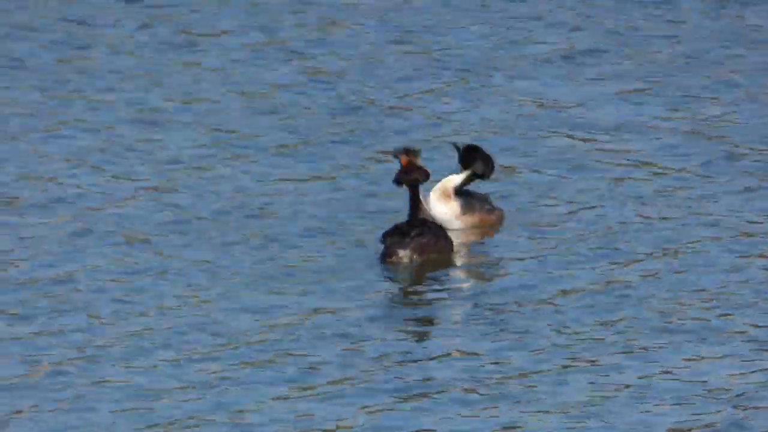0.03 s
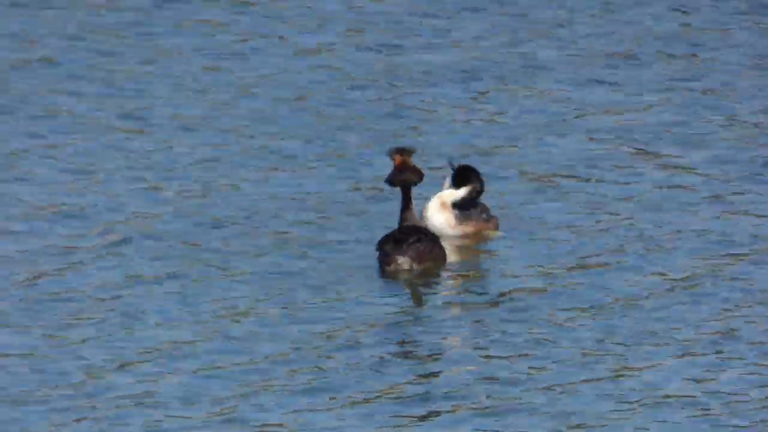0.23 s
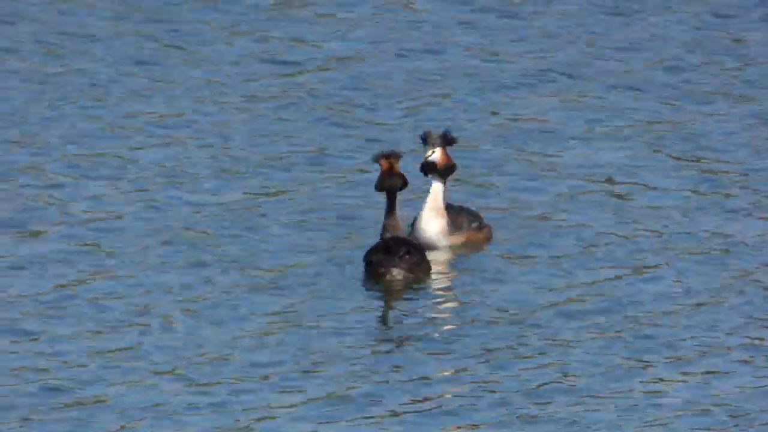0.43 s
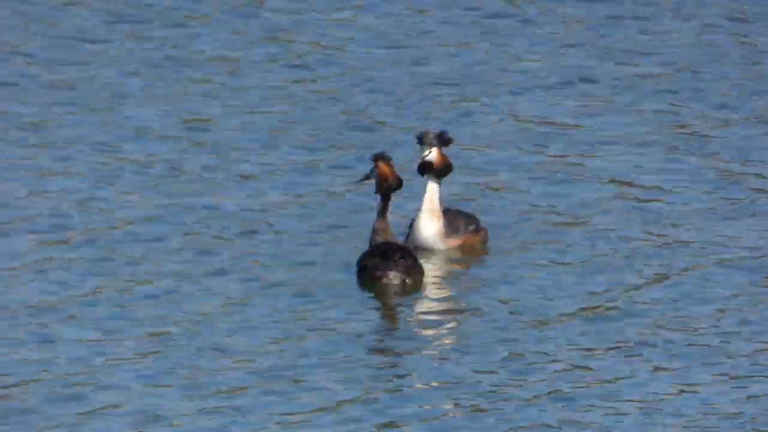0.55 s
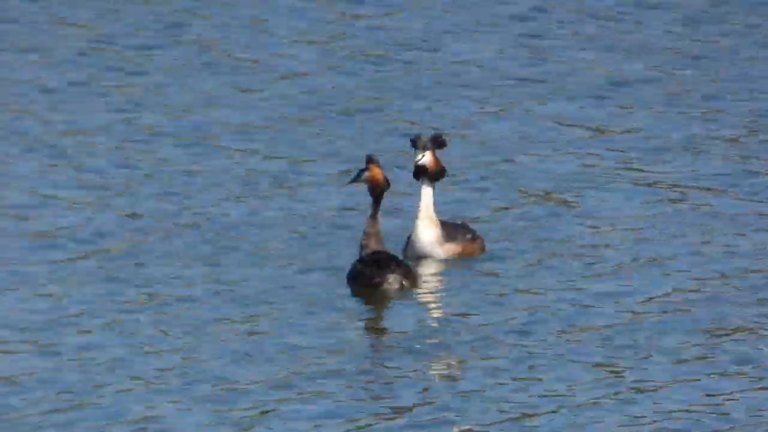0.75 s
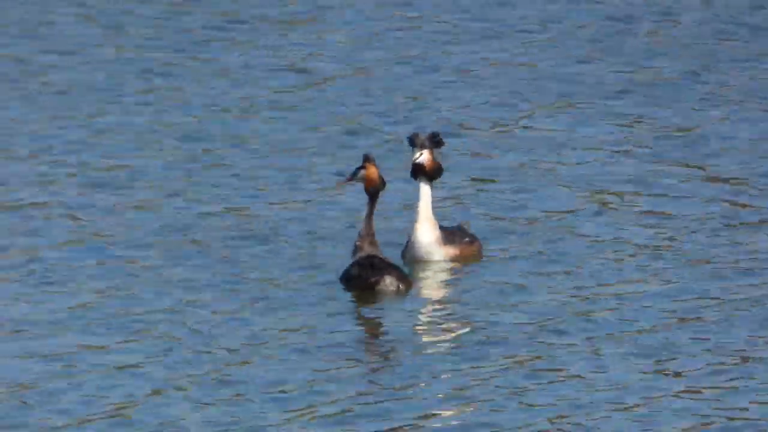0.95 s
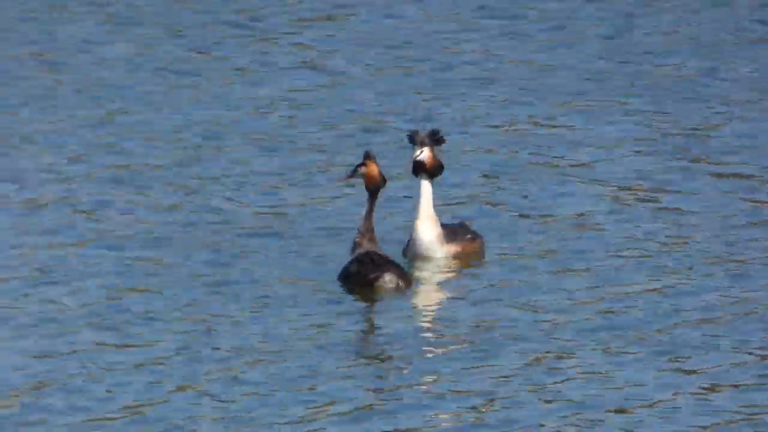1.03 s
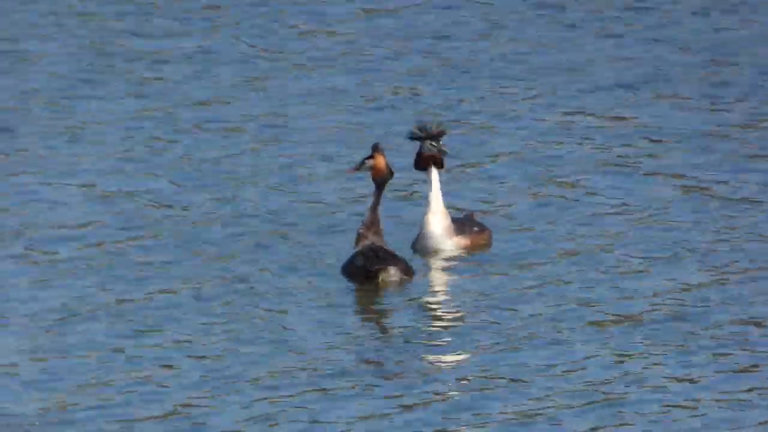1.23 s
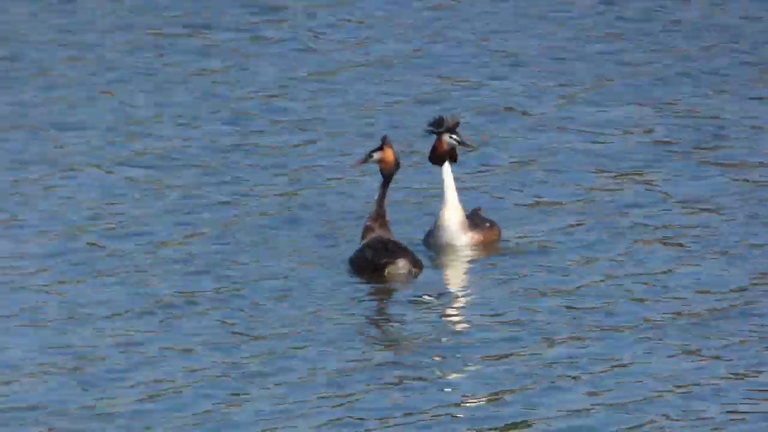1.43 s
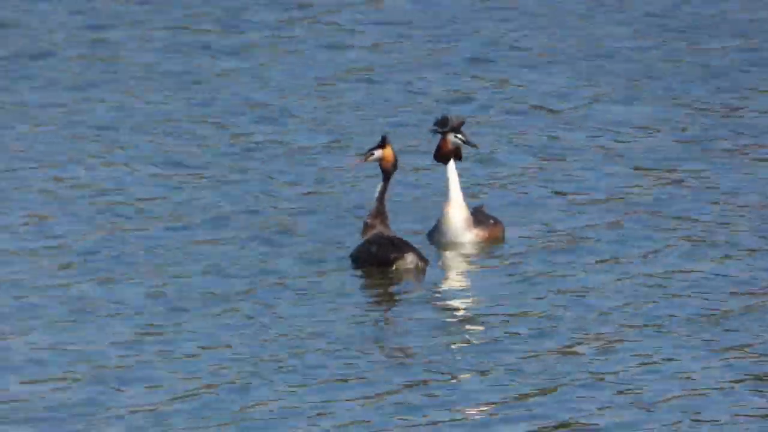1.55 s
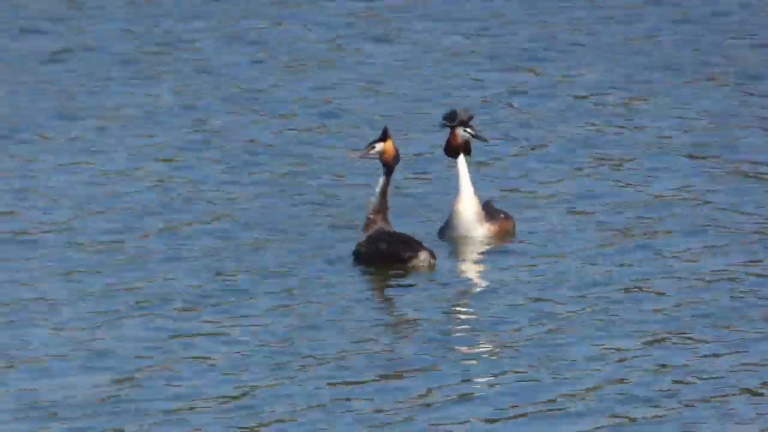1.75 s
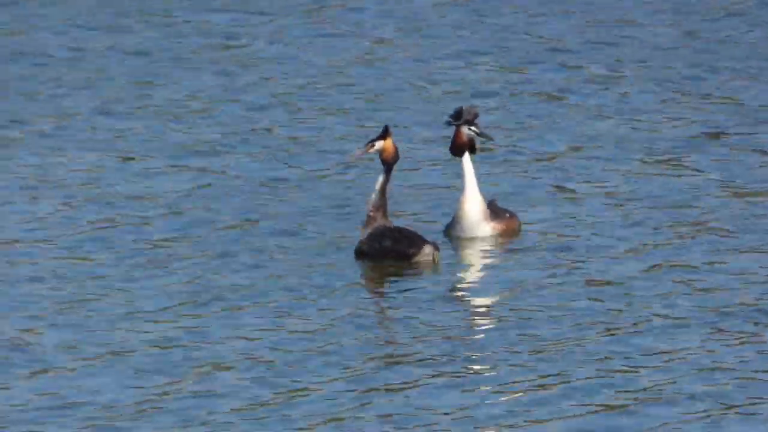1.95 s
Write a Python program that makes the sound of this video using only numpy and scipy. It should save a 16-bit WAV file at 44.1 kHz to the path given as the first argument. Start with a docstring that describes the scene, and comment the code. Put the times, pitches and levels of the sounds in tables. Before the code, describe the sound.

A faint small bird pipes thinly for the first 0.2 seconds over low, soft lake rumble. From about 0.2 to 0.86 a grebe calls harshly nearby, a rising whistle shredded by rapid rasping flutter, with throaty clucks and airy hiss, dropping as it closes. From 1.0 to 1.6 a weaker, reverberant call comes from far away. Small water plops appear from 0.87, with light splashes after 1.5.

```python
"""Grebe call on open water

Heard from the shore, in stereo: one harsh near call, a rising whistle that drops as it closes,
broken by about seventy rasping bursts a second (sine overtones, with clicks and air ringing a throat).
A fainter, blurred call of the same kind comes from far across the lake, mostly as reflections.
Wavelets plop (rising sines in froth) and splash (sprays of noise), and a small bird pipes faintly
as a wavering sine over a low distant rumble of coloured noise."""
import sys
import numpy as np
from scipy import signal
from scipy.fft import rfft, irfft
from scipy.io import wavfile
from scipy.ndimage import uniform_filter1d

SR = 44100
rng = np.random.default_rng(int(sys.argv[2]) if len(sys.argv) > 2 else 0)


def master_out(mix):
    """Clip the mix to full scale and print it as 16-bit PCM to the path in sys.argv[1]."""
    frames = np.transpose(np.atleast_2d(mix))
    ceiling = np.clip(frames, -1, 1)
    pcm = np.round(ceiling * 32767).astype(np.int16)
    wavfile.write(sys.argv[1], SR, pcm)


N = 88200  # samples, two seconds


def undb(db):
    """Decibels to amplitude gain."""
    return 10 ** (np.asarray(db) / 20)


def unit(x):
    """Scale to rms 1."""
    return x / np.sqrt(np.mean(x ** 2))


def colour(x, points):
    """Minimum-phase filter through (f/Hz, level/dB) points joined on a log-frequency axis."""
    hz, db = np.array(points, float).T
    f = np.maximum(np.arange(N // 2 + 1) * SR / N, 1)
    log_gain = np.log(undb(np.interp(np.log(f), np.log(hz), db)))
    # folding the cepstrum forward makes the filter causal
    cepstrum = irfft(log_gain, N)
    cepstrum[1:N // 2] *= 2
    cepstrum[N // 2 + 1:] = 0
    return irfft(rfft(x) * np.exp(rfft(cepstrum)), N)


def walk(rate):
    """Smooth random wander with spread 1; a higher rate in Hz wanders faster."""
    k = max(int(SR / rate), 1)
    noise = rng.standard_normal(N)
    return unit(uniform_filter1d(uniform_filter1d(noise, k), k))


def reflect(x, t60, damp_hz):
    """Diffuse reflections: a decaying noise tail, different in each ear, with a dulled treble."""
    t = np.arange(N) / SR
    pole = np.exp(-2 * np.pi * damp_hz / SR)
    tail = signal.lfilter([1 - pole], [1, -pole], rng.standard_normal((2, N)))
    tail *= undb(-60 * t / t60)
    tail /= np.sqrt(np.sum(tail ** 2, axis=1, keepdims=True))
    return signal.fftconvolve(x[None], tail, axes=1)[:, :N]


# near call: t/s, pitch f/Hz, whistle level/dB, octave overtone level/dB, rasp level/dB
NEAR_CALL = [(.215, 1617, -50, -67, -56), (.235, 1740, -48, -46, -42), (.26, 1850, -46, -44.5, -39.5),
             (.295, 2040, -39.5, -42.5, -35), (.312, 2146, -38.5, -38.5, -37),
             (.328, 2400, -33.5, -44, -34.5), (.36, 2506, -25, -37, -34), (.385, 2620, -28, -39, -35),
             (.42, 2600, -32, -41, -33), (.47, 2808, -29.5, -36.5, -34), (.53, 2947, -26.5, -42, -29.5),
             (.62, 3038, -36.5, -28, -31.5), (.71, 3071, -28.5, -30.5, -36), (.76, 3187, -38, -29, -40.5),
             (.80, 3055, -37.5, -38, -40), (.818, 2734, -34, -47, -43.5), (.832, 2623, -46, -55, -44.5),
             (.86, 2630, -61, -72, -53)]
# call from far across the lake: t/s, pitch f/Hz, whistle level/dB, octave level/dB, rasp level/dB
FAR_CALL = [(1.02, 1495, -56, -65, -61.5), (1.045, 1823, -60.5, -97, -60), (1.06, 2315, -47.5, -82, -61),
            (1.12, 2300, -54, -65, -56.5), (1.22, 2740, -57, -65, -57.5), (1.32, 3030, -53, -55, -53.5),
            (1.43, 3155, -54, -51.5, -56.5), (1.51, 3126, -75, -70, -57.5), (1.58, 2820, -72, -69, -63)]
NEAR_JITTER, FAR_JITTER = .008, .03  # pitch wander, as a share of the pitch
RIPPLE_T60_S, RIPPLE_DB = .07, -14
SHORE_T60_S, SHORE_DAMP_HZ, SHORE_DB, SHORE_DELAY_S = 0.35, 2500, -17, .07
FAR_WET_DB, FAR_DIRECT_DB, FAR_T60_S = -2.5, -3, 0.67


def calls(t):
    """The near call, scattered by ripples and returned by the shore, and the far call, mostly reflections."""
    near = grebe(NEAR_CALL, t, NEAR_JITTER) + clucks(t)
    far = grebe(FAR_CALL, t, FAR_JITTER)
    direct = placed(near + undb(FAR_DIRECT_DB) * far, t) + bill_hiss(t)
    ripples = undb(RIPPLE_DB) * reflect(near, RIPPLE_T60_S, damp_hz=12100)
    delayed = np.pad(near, (int(SHORE_DELAY_S * SR), 0))[:N]
    shore = undb(SHORE_DB) * reflect(delayed, SHORE_T60_S, SHORE_DAMP_HZ)
    far_reflections = undb(FAR_WET_DB) * reflect(far, FAR_T60_S, damp_hz=7940)
    return direct + ripples + shore + far_reflections


# overtones 3 and 4 against the octave, before the bill: level/dB
UPPER_OVERTONES = [-8, -7]
# what the bill passes of the overtones: f/Hz, level/dB
BILL = [(3000, -3), (4000, 5), (5000, -10.5), (6200, -7.5), (8000, 2), (9200, -16.5), (11000, -14),
        (15000, -35)]
# throat and bill colour of the rasp: f/Hz, relative level/dB per Hz
THROAT = [(400, -33), (800, -28), (1150, -8.5), (1600, -21.5), (2050, -6.5), (2450, 4), (3100, 1.5),
          (3500, -7), (4500, -8.5), (5300, -5), (6400, -4), (7300, -7.5), (8200, -20), (10000, -23.5),
          (12500, -28.5), (16000, -26)]
FIRST_BURST_S, FLUTTER_HZ, FLUTTER_SAG_HZ_PER_S = .2450, 73, 12
BURST_WIDTH = .16  # in flutter cycles
BURST_PITCH_DIP, BURST_JITTER = .07, .1  # shares of the pitch
BURST_DUCK = .35  # share of the tone's amplitude lost in a burst
RASP_BETWEEN_DB, BURST_SCATTER_DB, BREATH_DB = -15, .8, -1
CLICK_HZ, CLICK_SCATTER = 900, .2  # scatter in log rate
OVERTONE_BLUR_RAD, SHIMMER_DB = .4, .8


def grebe(table, t, jitter):
    """A whistle that dips and breaks up at each flutter, while a burst of uneven clicks and air rings the throat."""
    whistle, octave, rasp = (effort(table, t, column) for column in (2, 3, 4))
    age = t - FIRST_BURST_S
    cycle = FLUTTER_HZ * age - FLUTTER_SAG_HZ_PER_S * age ** 2 / 2 + 0.024 * walk(95)
    from_burst = (cycle + .5) % 1 - .5
    burst = np.exp(-.5 * (from_burst / BURST_WIDTH) ** 2)

    pitch = np.interp(t, *np.array(table).T[:2])
    break_up = burst ** 2 * (BURST_JITTER * walk(2000) - BURST_PITCH_DIP)
    hz = pitch * (1 + jitter * walk(285) + break_up)
    phase = 2 * np.pi * np.cumsum(hz) / SR
    blurred = phase + OVERTONE_BLUR_RAD * walk(900)
    overtones = np.sin(2 * blurred)
    for k, db in enumerate(UPPER_OVERTONES, 3):
        overtones = overtones + undb(db) * np.sin(k * blurred)
    tone = np.sqrt(2) * (whistle * np.sin(phase) + octave * colour(overtones, BILL))
    tone *= (1 - BURST_DUCK * burst) * undb(SHIMMER_DB * walk(180))

    # one click each time the uneven click count passes a whole number
    beats = np.floor(np.cumsum(CLICK_HZ * np.exp(CLICK_SCATTER * walk(700))) / SR)
    clicks = np.diff(beats, prepend=0)
    source = unit(clicks - clicks.mean()) + undb(BREATH_DB) * rng.standard_normal(N)
    drive = burst * undb(BURST_SCATTER_DB * walk(105)) + undb(RASP_BETWEEN_DB)
    return tone + rasp * unit(colour(source * drive, THROAT))


def effort(table, t, column):
    """Gain of one level column of a call, joined in dB; all but silent outside it."""
    rows = np.array(table)
    return undb(np.interp(t, rows[:, 0], rows[:, column], left=-120, right=-120))


# low croaking clucks as the call swells and as it closes: t/s, pitch f/Hz, level/dB
CLUCKS = [(0.368, 1070, -40.5), (.381, 1080, -37), (.837, 1150, -43), (0.853, 990, -41)]
CLUCK_ATTACK_S, CLUCK_DECAY_S = 0.0012, 0.0088


def clucks(t):
    """Short broad knocks of the lowest throat resonance, as noise peaked at its pitch."""
    out = np.zeros(N)
    for start, hz, db in CLUCKS:
        resonance = [(hz / 3, -35), (hz * .7, -10), (hz, 0), (hz * 1.4, -7), (hz * 4, -35), (hz * 12, -60)]
        ring = unit(colour(rng.standard_normal(N), resonance))
        knock = np.exp(np.minimum((t - start) / CLUCK_ATTACK_S, (start - t) / CLUCK_DECAY_S))
        out += undb(db) * ring * knock
    return out


# steady hiss of air through the bill: f/Hz, relative level/dB per Hz
HISS = [(5000, 2.5), (8300, 0.5), (10800, -2.5), (13300, 3.5), (15000, -10)]
HISS_DB = -48
HISS_START_S, HISS_ATTACK_S, HISS_FADE_S, HISS_RELEASE_S = 0.208, 0.014, 0.772, 0.049


def bill_hiss(t):
    """Air rushes through the open bill during the near call: noise, separate in each ear."""
    onset = np.clip((t - HISS_START_S) / HISS_ATTACK_S, 0, 1)
    flow = onset * np.exp(-np.maximum(t - HISS_FADE_S, 0) / HISS_RELEASE_S)
    air = np.array([unit(colour(rng.standard_normal(N), HISS)) for _ in range(2)])
    return undb(HISS_DB) * flow * undb(2 * walk(300)) * air


# full lean of the calls: f/Hz, left minus right level/dB
CALL_LEAN = [(1000, -8), (2700, -2.2), (4000, 0.5), (6200, -8.5), (9000, -6.5), (14000, -9)]
# the head turns away: t/s, share of the full lean (negative leans the opposite way)
HEAD_TURN = [(.25, -0.56), (.42, 0.22), (.63, 0.61), (.77, 0.68), (.86, 0.87)]


def placed(x, t):
    """The treble swings from left to right as the bird turns its head."""
    ears = []
    for sign in (1, -1):
        ears.append(colour(x, [(hz, sign * db / 2) for hz, db in CALL_LEAN]))
    return x + (np.array(ears) - x) * np.interp(t, *np.array(HEAD_TURN).T)


# plops of wavelets: t/s, starting pitch f/Hz, level/dB before the wavelet mix, length/s (peak at half)
PLOPS = [(.868, 472, -45, 0.033), (.958, 460, -47, 0.016), (1.518, 517.7, -37.5, 0.032),
         (1.673, 433, -41, 0.026), (1.796, 463, -41.5, 0.014)]
# splashes: t/s, level/dB before the wavelet mix, decay/s
SPLASHES = [(1.535, -53.5, 0.1), (1.721, -47, 0.042), (1.762, -54.5, 0.055), (1.845, -53.5, 0.017),
            (1.89, -55.5, 0.15)]
# colour of a splash: f/Hz, relative level/dB per Hz
SPRAY = [(300, -13), (700, -1), (1150, 9), (1800, -1), (4500, -1.5), (9000, -7.5), (15000, -25)]
PLOP_RISE, PLOP_FROTH_DB = .1, 0  # rise as a share of the pitch per length
SPLASH_ATTACK_S = 0.014


def wavelets(t):
    """Bubbles rising in pitch in a little froth, and splashes of fine drops as flickering noise."""
    out = np.zeros(N)
    for start, hz, db, length in PLOPS:
        age = np.clip((t - start) / length, 0, 10)  # in lengths
        bubble = np.sin(2 * np.pi * hz * length * (age + PLOP_RISE * age ** 2 / 2))
        froth = unit(colour(rng.standard_normal(N), [(hz / 4, -40), (hz, 0), (hz * 4, -40)]))
        swell = (2 * age * np.exp(1 - 2 * age)) ** 2
        out += undb(db) * swell * (bubble + undb(PLOP_FROTH_DB) * froth) / 2
    spray = unit(colour(rng.standard_normal(N) * undb(3.3 * walk(1500)), SPRAY))
    for start, db, decay in SPLASHES:
        out += spray * undb(db) * np.exp(np.minimum((t - start) / SPLASH_ATTACK_S, (start - t) / decay))
    return undb(-2) * out + undb(-8) * reflect(out, t60=.06, damp_hz=6000)


# small far bird: t/s, pitch f/Hz, level/dB of the sine's peak
PIPING = [(0, 4360, -60), (.06, 4310, -73), (.105, 4290, -56), (.13, 4110, -70), (.16, 4130, -59),
          (.22, 4160, -70)]


def small_bird(t):
    """A thin wavering whistle from the bank, heard only through its reflections."""
    when, hz, db = np.array(PIPING).T
    wavering_hz = np.interp(t, when, hz) * (1 + 0.054 * walk(1000))
    phase = 2 * np.pi * np.cumsum(wavering_hz) / SR
    piping = np.sin(phase) * undb(np.interp(t, when, db, right=-120))
    return reflect(piping, t60=0.083, damp_hz=8700)


# lake background: f/Hz, relative level/dB per Hz
LAKE = [(25, -20), (40, -29), (60, -15), (100, -6), (150, 1.5), (260, 0), (320, -2), (375, -11), (480, -4),
        (640, -11.5), (820, -13), (1100, -15), (1450, -22), (2100, -25.5), (3000, -28.5), (5500, -32.5),
        (9000, -35.5), (15000, -44.5)]
# width of the background: f/Hz, side minus mid level/dB
LAKE_WIDTH = [(30, -17), (70, -15), (150, -31), (280, -19), (450, -9.5), (900, 5.5), (2000, -11),
              (12000, -3)]
LAKE_DB, LAKE_FLICKER_DB, LAKE_FLICKER_HZ = -46.5, 1.19, 20


def lake():
    """Distant rumble, alike in both ears, under a wide wash of lapping water: mid and side noise."""
    mid, side = (unit(colour(rng.standard_normal(N) * undb(LAKE_FLICKER_DB * walk(LAKE_FLICKER_HZ)), LAKE))
                 for _ in range(2))
    side = colour(side, LAKE_WIDTH)
    return undb(LAKE_DB) * (mid + np.array([side, -side]))


def scene():
    """Everything heard from the shore, left and right."""
    t = np.arange(N) / SR
    return calls(t) + wavelets(t) + small_bird(t) + lake()


TOP_HZ = 15400


def record(dry):
    """The top of the treble is cut by a steep low-pass behind the microphones."""
    low_pass = signal.ellip(10, .2, 80, TOP_HZ, fs=SR, output="sos")
    return signal.sosfilt(low_pass, dry)


dry = scene()
out = record(dry)
master_out(out)
```